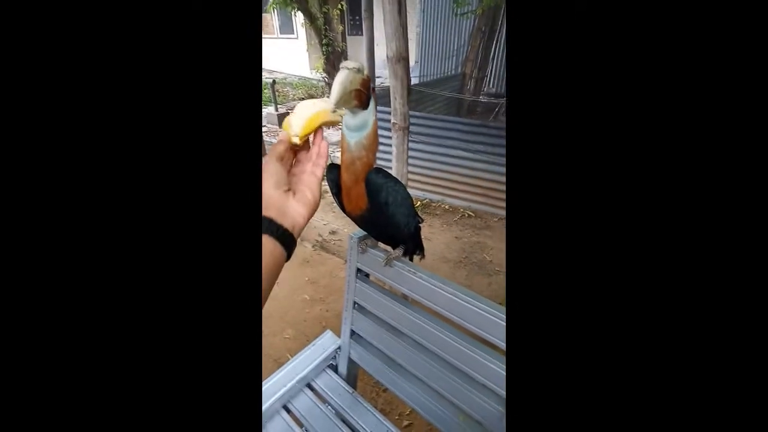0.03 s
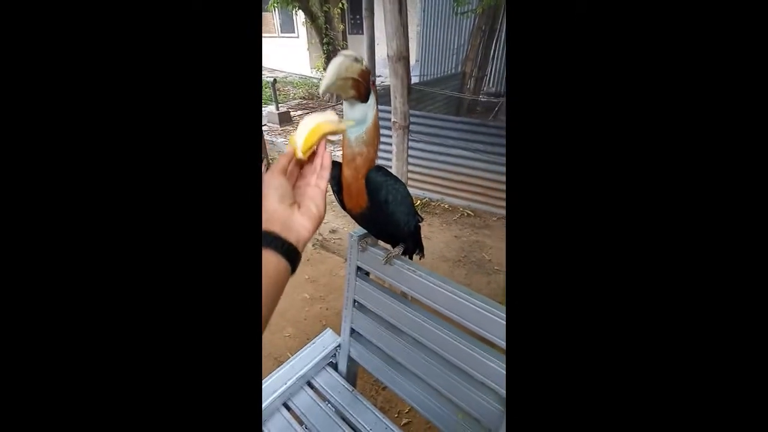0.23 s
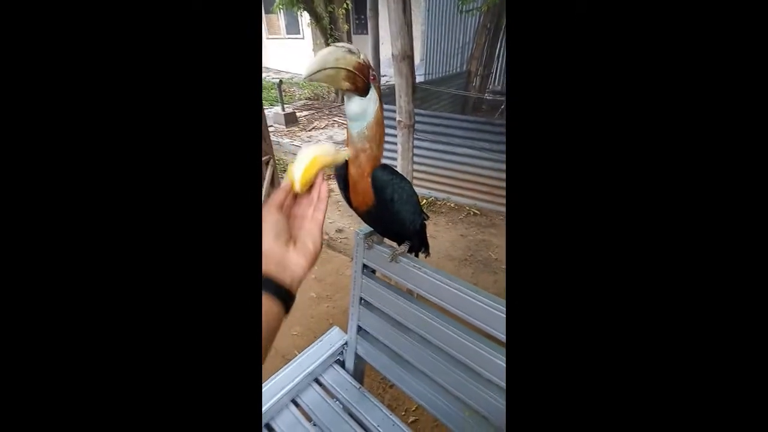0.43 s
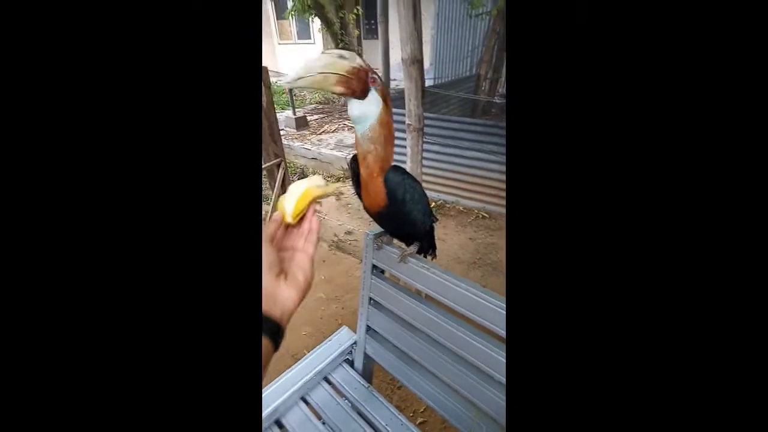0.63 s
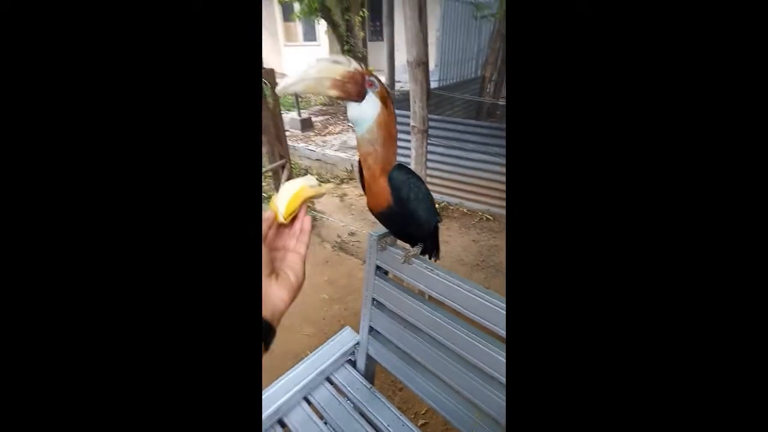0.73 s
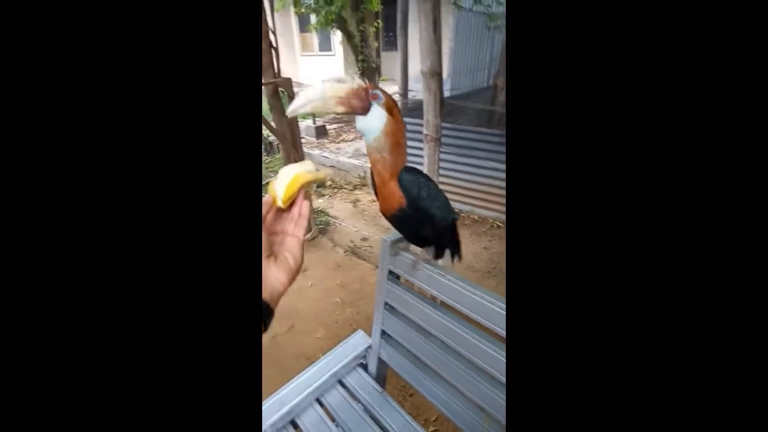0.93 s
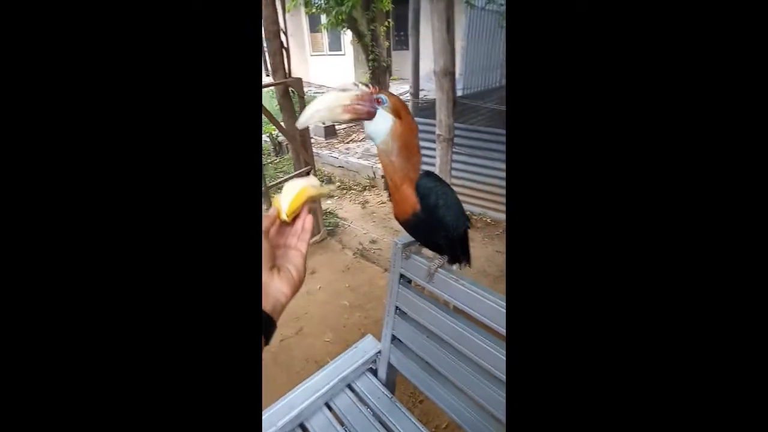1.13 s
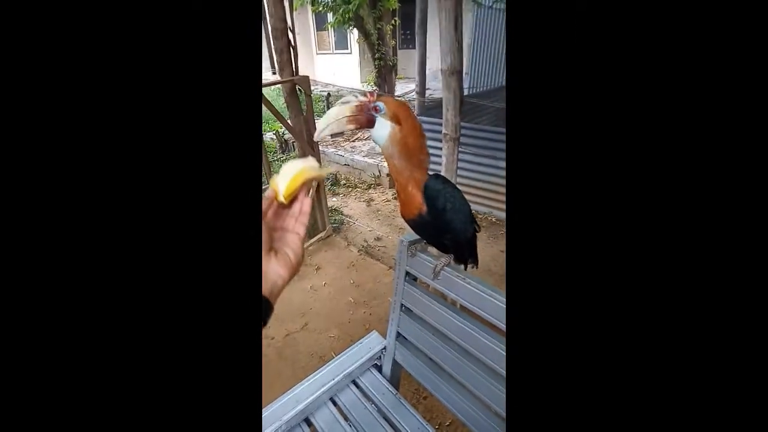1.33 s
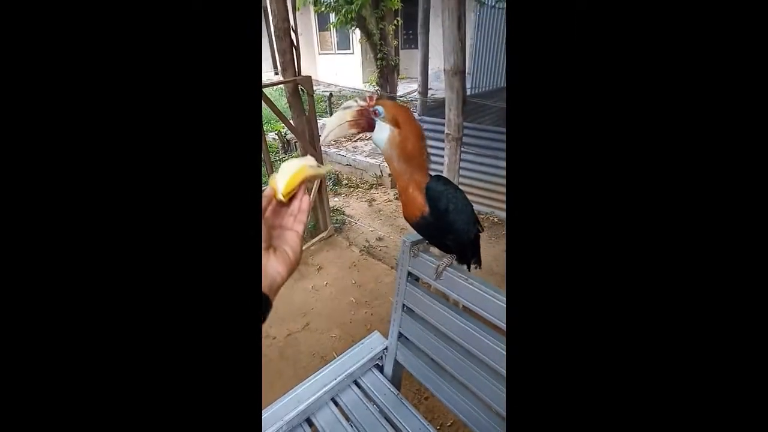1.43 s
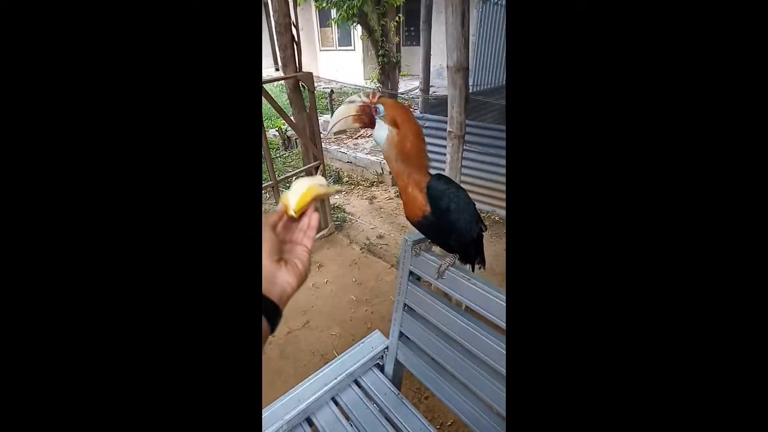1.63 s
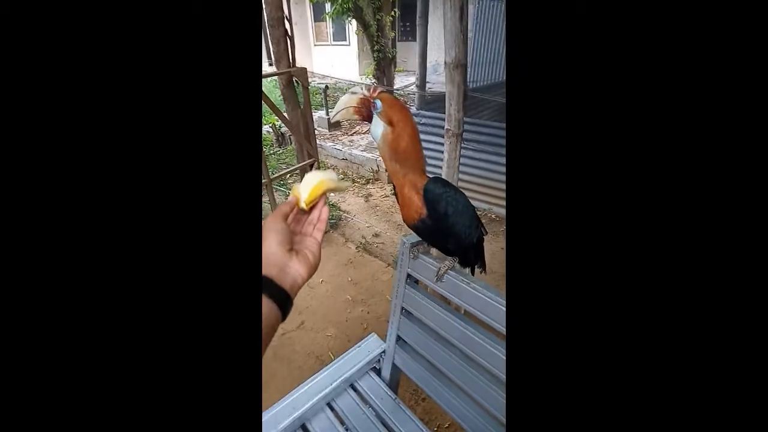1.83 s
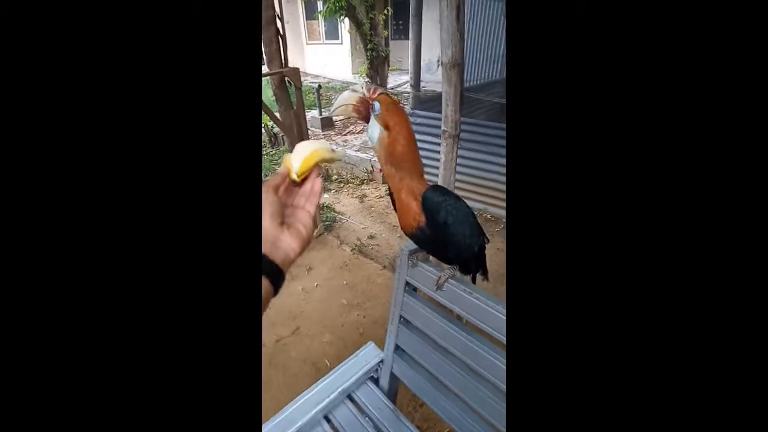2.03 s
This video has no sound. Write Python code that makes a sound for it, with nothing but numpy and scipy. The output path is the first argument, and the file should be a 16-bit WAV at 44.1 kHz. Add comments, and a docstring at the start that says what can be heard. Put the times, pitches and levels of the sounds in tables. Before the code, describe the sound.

Three quick raspy honks come from a large bird nearby in a quiet yard, just after a soft grunt. A single sharp bill clack follows, echoing briefly off house walls, leaving only faint outdoor rumble and rustles.

```python
"""Hornbill in a yard

From a bench near the microphone, a hornbill gives a soft two-pulse grunt, three harsh honks and one
sharp knock, probably with its bill. Each honk is a short train of pulses through throat and bill,
whose pitch and brightness arch with the effort. Nearby house walls answer. Behind the bird lie a low
outdoor rumble, a faint hiss, small rustles and bumps, and a barely audible insect far away."""
import sys
import numpy as np
from scipy import signal
from scipy.fft import rfft, irfft, next_fast_len
from scipy.io import wavfile
from scipy.ndimage import map_coordinates

SR = 44100
rng = np.random.default_rng(int(sys.argv[2]) if len(sys.argv) > 2 else 0)


def log_audio(samples):
    """Write samples as a 16-bit WAV file to the path given in sys.argv[1]."""
    # one column per channel
    frames = np.atleast_2d(samples).T
    # limit to full scale, then quantise
    limited = np.clip(frames, -1, 1)
    pcm = np.round(limited * 32767).astype(np.int16)
    wavfile.write(sys.argv[1], SR, pcm)


N = 92610

# Open-bill calls: (start [s], length [s], top pitch [Hz], level re HONK_DB [dB], throat resonance
# scale [ratio], nasal peak [dB], treble peak [dB], scatter as the head turns aside [dB])
HONKS = [(0.1992, 0.06, 205, -6, 0.994, -4.5, 10, 0), (.3650, .070, 222.9, -5.5, 0.991, -5.5, 6, 1),
         (0.5955, .066, 187.9, -6, 1.001, 2.5, -0.5, 1.5)]
# Response of throat and open bill: (frequency [Hz], gain [dB])
THROAT_COLOUR = [(60, -27.5), (140, -4.5), (195, 1.5), (270, 2), (370, 6), (450, 1), (530, 11.5),
                 (660, 7.5), (790, -12), (980, 8.5), (1100, 11.5), (1250, 7), (1450, -12), (1650, 1.5),
                 (1860, 8), (2120, -11.5), (2500, -1), (2870, -1), (3200, -1), (3600, -3.5), (4200, -21),
                 (5200, -40.5), (6500, -41), (8300, -43), (10500, -67), (15000, -67.5)]
# Throat sac, ringing on after each pulse: (frequency [Hz], relative level [dB], t60 [s])
SAC_MODES = [(536.4, -27.5, 0.19)]
# Single throat pulses of the grunt: (time [s], level [dB])
GRUNT_PULSES = [(.0808, -14.5), (0.094, -15)]
# Throat with the bill closed: (frequency [Hz], relative level [dB], t60 [s])
CLOSED_THROAT_MODES = [(186, -16.5, 0.023), (385, -26, 0.06), (545.5, -12.5, 0.11), (641, -12.5, 0.11),
                       (1010, -17, 0.042), (1182, -24, 0.042), (1840, -20, .016), (2310, -26.5, 0.01),
                       (3880, -18, .006)]
# Bill edges meeting in a quick rattle: (delay [s], level re CONTACT_DB [dB])
BILL_CONTACTS = [(0, -5.5), (.004, -0.5), (.0075, -1.5), (.011, -5.5)]
# Tone of those contacts: (frequency [Hz], gain [dB])
KNOCK_COLOUR = [(100, -33), (450, -17.5), (700, -7), (1100, -11), (1500, -3.5), (2100, -0.5), (2500, 3),
                (3700, 1.5), (4400, -9.5), (5200, -20.5), (8300, -23), (10500, -37.5), (15500, -43)]
# Hollow ring of the bill: (frequency [Hz], level [dB], t60 [s])
BILL_MODES = [(1780, -45, .12), (2460, -44, .25)]
# Decay of the echo between the house walls: (frequency [Hz], t60 [s])
WALLS_T60 = [(150, .2), (400, 0.18), (700, 0.69), (1100, 0.4), (2500, 0.36), (5000, 0.29), (12000, 0.24)]
# Tone of that echo: (frequency [Hz], gain [dB])
WALLS_COLOUR = [(150, -10), (350, -2.5), (650, -2), (1100, -1), (2500, 4), (4500, 1.5), (12000, -1.5)]
# Distant outdoor rumble and hiss: (frequency [Hz], relative level [dB])
AIR_COLOUR = [(25, -36), (45, -11.5), (62, -5), (120, 2.5), (190, -6.5), (370, -9), (600, -10),
              (900, -18.5), (1500, -17), (2500, -20), (3400, -23), (4300, -31.5), (5200, -50), (8300, -51),
              (10500, -58), (15500, -65)]
# Faint rustles around the yard: (peak time [s], half length [s], level [dB])
RUSTLES = [(.872, 0.023, -49), (1.52, 0.0093, -58.5), (1.97, 0.012, -60)]
# Tone of the rustles: (frequency [Hz], relative level [dB])
RUSTLE_COLOUR = [(300, -25), (1200, 0), (1700, 8.5), (2800, 8), (4100, -0.5), (5200, -24), (8000, -27),
                 (14000, -47)]
# Dull low bumps: (peak time [s], half length [s], level [dB])
BUMPS = [(1.308, 0.0072, -41), (1.66, 0.046, -46)]
# Tone of the bumps: (frequency [Hz], relative level [dB])
BUMP_COLOUR = [(25, -6), (65, 3.5), (130, 5.5), (220, -8), (800, -48), (4000, -67)]

HONK_DB, PITCH_SAG = 17, .31  # PITCH_SAG: share of the pitch lost at both ends of a honk
SLACK_GAIN_DB, SLACK_MID_DB, SLACK_HISS_DB = 1, -8, -6  # at both ends: a little more gain, duller tone
MID_HZ, MID_OCTAVES, HISS_HZ = 1170, 0.28, 6000
NASAL_HZ, NASAL_OCTAVES, TREBLE_HZ, TREBLE_OCTAVES = 1650, 0.18, 4580, 0.13
TIRING_DB, TIRING_HZ = 0.5, 3450  # the treble fades slightly through a honk
ONSET_DB, ONSET_S = 6.5, 0.0058  # the first pulse is held back
BLUR_HZ, BLUR_WIDTH_HZ = 1100, 500  # the long bill delays its mid-range, which blunts each pulse
JITTER_S, SHIMMER_DB = .00004, 1.1  # pulses vary in timing and strength
RASP_DB, RASP_DECAY_S, RASP_ABOVE_HZ = -4.5, .003, 2000  # air noise after each pulse
GRUNT_BAND_HZ, GRUNT_SCATTER_DB, VOICE_WALLS_DB = (131, 2700), -17, -18.5
KNOCK_S, CONTACT_T60, CONTACT_DB, KNOCK_SCATTER_DB, KNOCK_WALLS_DB = .9572, 0.02, 10, 6, -8
MELLOW_HZ, MELLOW_ECHO_DB = 977, 6.5  # the knock reaches the walls duller than the microphone
SCATTER_T60, SCATTER_DELAY_S, SCATTER_ABOVE_HZ, WALLS_DELAY_S = 0.061, .002, 900, 0.017
SCATTER_EVEN = .6  # share of the scatter's comb colour that is evened out
AIR_DB, AIR_WANDER_DB, AIR_WANDER_HZ = -49, 3.5, 6
INSECT_HZ, INSECT_WIDTH_HZ, INSECT_DB, INSECT_S, INSECT_HALF_S = 6040, 110, -87, 1.33, 0.5
TOP_HZ, FRAME = 15700, 4096  # FRAME: samples in one pulse or noise burst


def honk(length, top_hz, db, throat_scale, nasal_db, treble_db):
    """Raspy pulses through throat and bill speed up and brighten towards mid-call, then slacken."""
    hz = np.fft.rfftfreq(FRAME, 1 / SR)
    hump = lambda centre, octaves: np.exp(-.5 * (np.log2((hz + 1) / centre) / octaves) ** 2)
    shelf = lambda corner: hz ** 2 / (hz ** 2 + corner ** 2)
    slack = lambda s: min((2 * s / length - 1) ** 2, 1)  # 0 at full effort, 1 at both ends
    throat_db = HONK_DB + along(THROAT_COLOUR, hz / throat_scale)
    throat_db += nasal_db * hump(NASAL_HZ, NASAL_OCTAVES) + treble_db * hump(TREBLE_HZ, TREBLE_OCTAVES)
    dulling_db = SLACK_MID_DB * hump(MID_HZ, MID_OCTAVES) + SLACK_HISS_DB * shelf(HISS_HZ)
    tiring_db = TIRING_DB * shelf(TIRING_HZ)
    blur = np.exp(-2j * np.arctan2(hz * BLUR_WIDTH_HZ, BLUR_HZ ** 2 - hz ** 2))
    sac = ring(SAC_MODES)
    pulses = [(*rng.standard_normal(2), puff(RASP_DECAY_S * np.log(1000))) for _ in range(20)]
    out, s = np.zeros(SR // 3), 0
    for jitter, shimmer, breath in pulses:
        if s > length:
            break
        held_db = ONSET_DB * np.exp(-s / ONSET_S)
        gain = amp(db + SHIMMER_DB * shimmer + slack(s) * SLACK_GAIN_DB - held_db)
        rasp = amp(RASP_DB) * rfft(breath) * 1j * hz / (1j * hz + RASP_ABOVE_HZ)
        colour_db = throat_db + slack(s) * dulling_db - (s / length - .5) * tiring_db
        pulse = irfft(causal(colour_db) * blur * (1 + rasp))
        add(out, max(s + JITTER_S * jitter, 0), gain * pulse)
        add(out, s, gain * sac)
        s += 1 / (top_hz * (1 - PITCH_SAG * slack(s + .5 / top_hz)))
    return out


def honks():
    """Three calls from the bench, with more scatter at the microphone as the head turns aside."""
    out = np.zeros(N)
    for s, *call, scatter_db in HONKS:
        add(out, s, yard(honk(*call), scatter_db, VOICE_WALLS_DB))
    return out


def grunt():
    """Two soft pulses ring the throat, muffled by the closed bill."""
    throat = np.zeros(N)
    for s, db in GRUNT_PULSES:
        add(throat, s, amp(db) * ring(CLOSED_THROAT_MODES))
    muffled = filtered(throat, "band", GRUNT_BAND_HZ, order=3)
    return yard(muffled, GRUNT_SCATTER_DB, VOICE_WALLS_DB)[:N]


def knock():
    """Hard bill contacts in quick succession, with a slight hollow ring and a mellow wall echo."""
    out, hits = np.zeros(N), np.zeros(4 * FRAME)
    for delay, db in BILL_CONTACTS:
        add(hits, delay, amp(db + CONTACT_DB) * puff(CONTACT_T60))
    hz = np.fft.rfftfreq(len(hits), 1 / SR)
    snap = irfft(rfft(hits) * causal(along(KNOCK_COLOUR, hz)))
    add(snap, BILL_CONTACTS[1][0], ring(BILL_MODES))  # the hardest contact rings the bill
    add(out, KNOCK_S, yard(snap, KNOCK_SCATTER_DB, KNOCK_WALLS_DB))
    add(out, KNOCK_S, amp(MELLOW_ECHO_DB) * walls(filtered(snap, "low", MELLOW_HZ)))
    return out


def yard(x, scatter_db, walls_db):
    """Bird to microphone: the direct sound, short waves scattered off bench and ground, then walls."""
    paths = np.zeros(SR // 2)
    paths[0] = 1  # direct sound
    scatter = filtered(puff(SCATTER_T60), "high", SCATTER_ABOVE_HZ)
    add(paths, SCATTER_DELAY_S, amp(scatter_db) * scatter)
    comb = rfft(paths)
    comb_db = 20 * np.log10(np.abs(comb) + amp(-20))
    evened = irfft(comb * causal(-SCATTER_EVEN * comb_db))
    out = np.pad(signal.fftconvolve(x, evened), (0, SR // 2))
    add(out, 0, amp(walls_db) * walls(x))
    return out


def walls(x):
    """Nearby house walls answer a little later, each frequency dying at its own speed."""
    hz, t, bands = signal.stft(rng.standard_normal(SR), SR, nperseg=256)
    bands = bands * np.exp(-np.log(1000) * t / along(WALLS_T60, hz)[:, None])
    coloured = bands * amp(along(WALLS_COLOUR, hz))[:, None]
    plain, tail = signal.istft(np.array([bands, coloured]), SR, nperseg=256)[1]
    echo = np.pad(tail / np.linalg.norm(plain), (int(WALLS_DELAY_S * SR), 0))
    return signal.fftconvolve(x, echo)


def background():
    """Distant rumble and hiss wander in level, with faint rustles and dull bumps."""
    wander = map_coordinates(rng.standard_normal(40), [np.arange(N) * AIR_WANDER_HZ / SR], mode="mirror")
    air = amp(AIR_DB + AIR_WANDER_DB * wander) * noise(AIR_COLOUR)
    return air + swells(RUSTLES, RUSTLE_COLOUR) + swells(BUMPS, BUMP_COLOUR)


def insect():
    """A very faint narrow shrill swells and fades, far from the microphone."""
    band = [(INSECT_HZ + k * INSECT_WIDTH_HZ, db) for k, db in [(-3, -60), (-1, 0), (1, 0), (3, -60)]]
    return swells([(INSECT_S, INSECT_HALF_S, INSECT_DB)], band)


def swells(rows, colour):
    """Bell-shaped swells of coloured noise."""
    t = np.arange(N) / SR
    return noise(colour) * sum(amp(db) * np.exp(-.5 * ((t - s) / half) ** 2) for s, half, db in rows)


def noise(colour):
    """Coloured noise of rms 1."""
    size = next_fast_len(N + FRAME)
    gains = amp(along(colour, np.fft.rfftfreq(size, 1 / SR)))
    x = irfft(rfft(rng.standard_normal(size)) * gains, size)[:N]
    return x / np.sqrt(np.mean(x ** 2) + 1e-20)


def ring(modes):
    """Damped sines of a struck resonator."""
    t = np.arange(SR // 3) / SR
    return sum(amp(db) * np.exp(-np.log(1000) * t / t60) * np.sin(2 * np.pi * hz * t)
               for hz, db, t60 in modes)


def puff(t60):
    """A dying burst of noise with energy 1."""
    burst = rng.standard_normal(FRAME) * np.exp(-np.log(1000) * np.arange(FRAME) / SR / t60)
    return burst / np.linalg.norm(burst)


def causal(db):
    """Minimum-phase response with the given gains."""
    cepstrum = irfft(db * np.log(10) / 20)
    cepstrum[1:len(cepstrum) // 2] *= 2
    cepstrum[len(cepstrum) // 2 + 1:] = 0
    return np.exp(rfft(cepstrum))


def filtered(x, kind, hz, order=2):
    """Low-, high- or band-pass a sound."""
    return signal.sosfilt(signal.butter(order, hz, kind, fs=SR, output="sos"), x)


def amp(db):
    """Decibels to gain."""
    return 10 ** (np.asarray(db) / 20)


def along(points, hz):
    """Read (frequency [Hz], value) points on a log axis."""
    frequencies, values = np.transpose(points)
    return np.interp(np.log(hz + 1), np.log(frequencies + 1), values)


def add(track, s, sound):
    """Mix a sound into a track at time s."""
    part = track[int(s * SR):][:len(sound)]
    part += sound[:len(part)]


def scene():
    """The bird in its yard, heard at one microphone."""
    return (grunt() + honks() + knock() + background() + insect())[None]


def record(dry):
    """The recorder keeps nothing above its band limit."""
    size = next_fast_len(N + FRAME)
    passband = np.fft.rfftfreq(size, 1 / SR) < TOP_HZ
    return irfft(rfft(dry, size) * passband, size)[..., :N]


dry = scene()
out = record(dry)
log_audio(out)
```